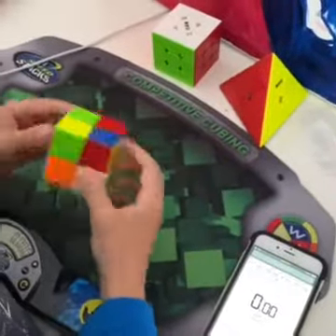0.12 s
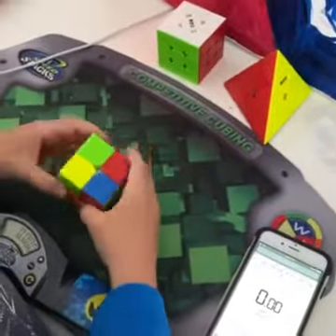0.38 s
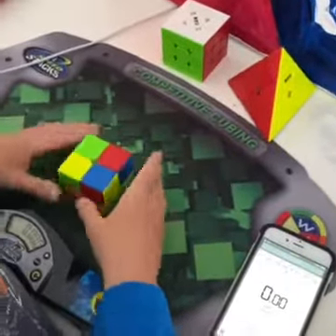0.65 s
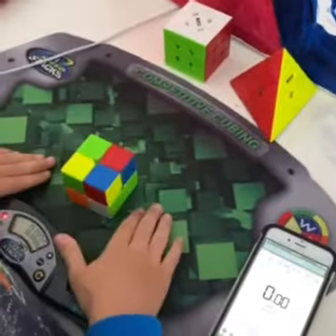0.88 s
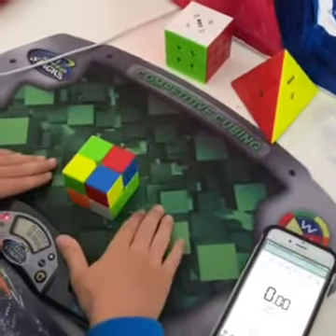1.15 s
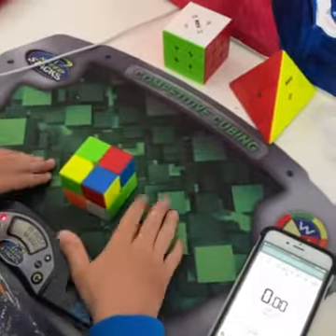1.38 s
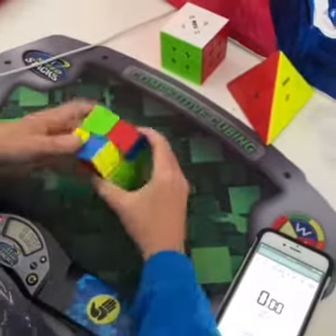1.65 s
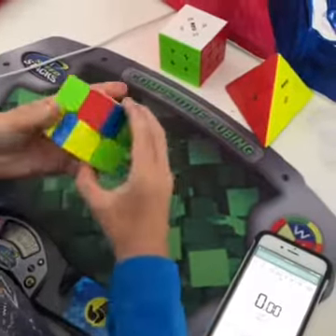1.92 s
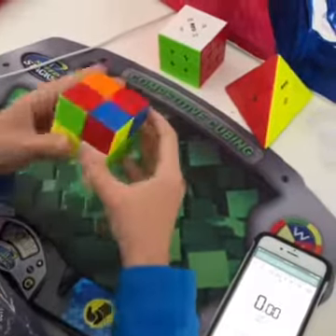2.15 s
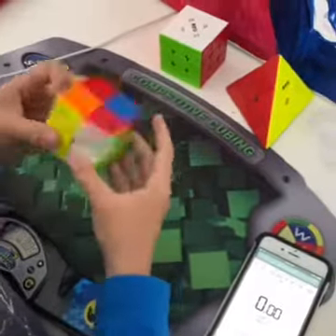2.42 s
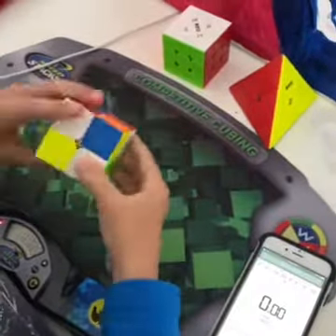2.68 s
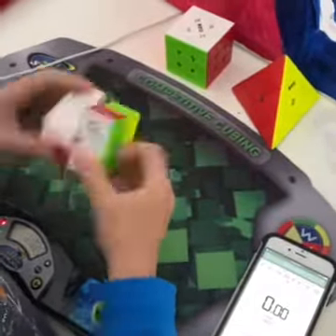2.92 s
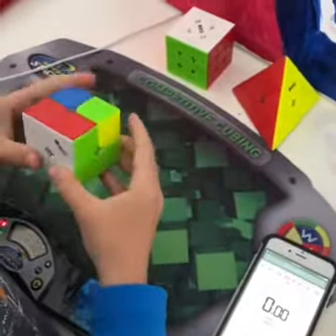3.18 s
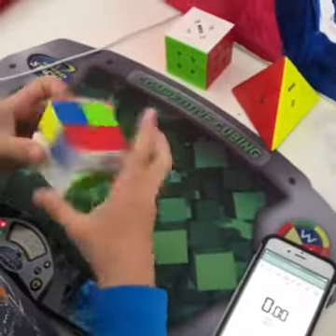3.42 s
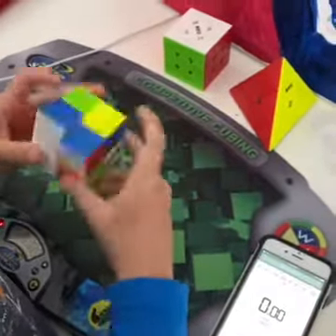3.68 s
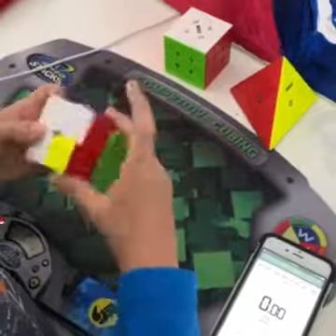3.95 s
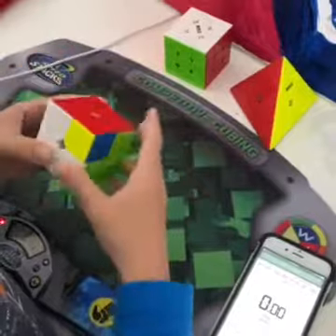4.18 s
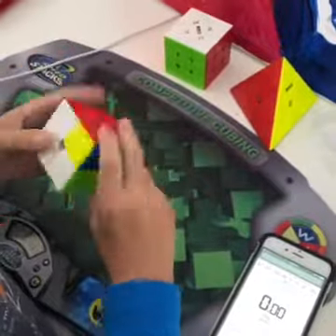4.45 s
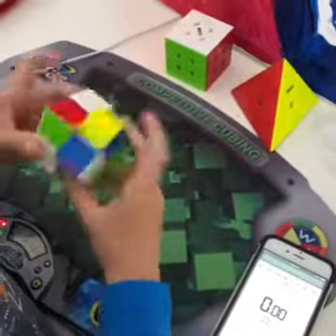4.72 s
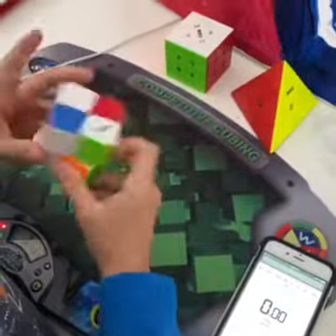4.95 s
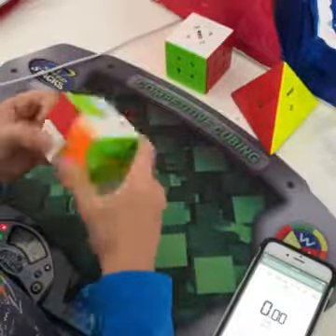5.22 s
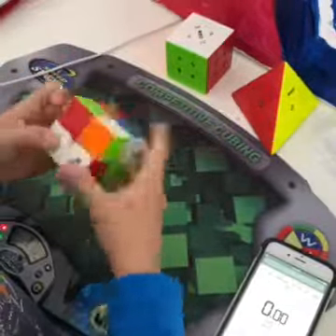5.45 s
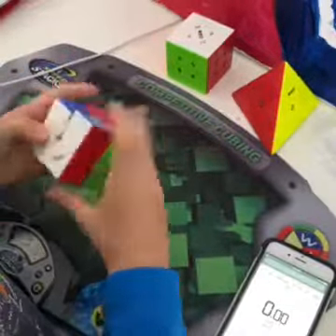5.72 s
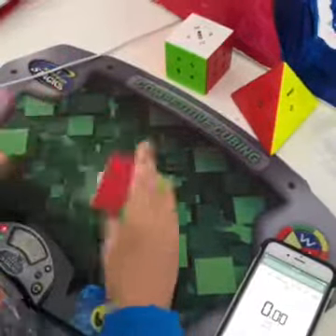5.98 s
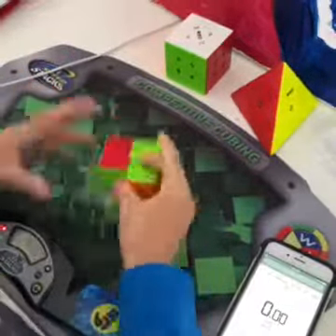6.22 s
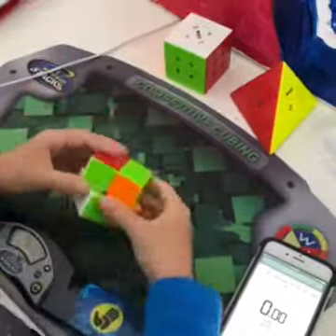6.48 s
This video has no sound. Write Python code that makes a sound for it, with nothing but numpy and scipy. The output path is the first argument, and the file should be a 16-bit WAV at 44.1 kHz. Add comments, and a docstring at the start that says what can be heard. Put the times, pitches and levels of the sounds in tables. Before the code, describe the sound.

A quiet, dark hum and soft air noise run throughout in a small room, heard closely in stereo. Around 0.4 and 0.6 s a hollow plastic puzzle cube bumps onto a matted table with dull low thuds, and at 0.8 s a softer touch and brush of hands follows. Near quiet until a faint rustle at 1.4 s; at 1.5 s the cube is picked up with light clicks. From 1.6 s layers turn in quick snapping bursts with grainy scrapes, busy around 2.0, 2.4 and 2.8 s, sparse near 3.1 s, then sharper at 3.6 to 4.0 s. After a short gap, clicking resumes at 4.4 s and thickens into loud, bright clatter peaking around 5.3 s, thinning by 5.7 s. At 5.9 s the cube drops with a hard slap and deep table boom; at 6.24 s a second, less boomy slap lands, fading into hum by 6.6 s.

```python
"""A deep machine hum and dark air noise come first; then a hollow plastic puzzle cube is set on a mat.
It is picked up and turned fast, then dropped twice. Contacts and sliding grains ring its hollow pieces;
mat landings ring the table as decaying sines, with filtered-noise brushing and dry slaps above.
A small room answers with noise tails. A phone with two microphone ports lies close by, the left one nearer."""
import sys
import numpy as np
from scipy import signal
from scipy.fft import rfft, irfft
from scipy.io import wavfile
from scipy.ndimage import uniform_filter1d, map_coordinates

SR = 44100
rng = np.random.default_rng(int(sys.argv[2]) if len(sys.argv) > 2 else 0)


def to_wav(sig):
    """Store sig (one row per channel, or 1-D mono) as 16-bit WAV at the path in sys.argv[1].

    Samples outside -1..1 are clipped; the rate is SR.
    """
    pcm = np.clip(np.atleast_2d(sig), -1, 1) * 32767
    pcm = np.round(pcm).astype(np.int16)
    wavfile.write(sys.argv[1], SR, pcm.T)  # frames by channels


def volts(x):
    """Linear amplitude factor 10**(x/20) for a level x in dB, scalar or array-like."""
    e = np.asarray(x, float) / 20
    return 10 ** e


N = 291439  # samples

# Levels in the tables are relative, ahead of the room and the final tone colour, unless marked rms or peak.
# wavering bands of the machine hum: centre_hz, width_hz (of the first of two resonances), level_db (rms)
HUM_BANDS = [(52.7, 25, -61.5), (274.9, 7.8, -71), (417.6, 7, -77.5)]
# centre and rms level of the motor note; size of its random pitch waver before smoothing
MOTOR_HZ, MOTOR_DB, WAVER_HZ = 56.5, -55, 1.65
# faint drifting tone: time_s, pitch_hz, level_db (rms)
FAINT_TONE = [(2.901, 150.8, -76.5), (3.802, 162, -69), (4.499, 168, -69), (6.61, 166.6, -67.5)]
# spectrum of the air noise: frequency_hz, level_db
AIR_SPECTRUM = [(37, -18.5), (59, -20.5), (82, -10), (206, -20), (270, -21.5), (363, -25.5), (620, -29.5),
                (734, -40.5), (4500, -56.5), (6500, -56), (8500, -58.5), (16000, -64)]
AIR_DB = -64  # rms, before the side part is turned down
# decay of the room in bands: centre_hz, t60_s, side_share (0-1)
ROOM_BANDS = [(121, 0.41, 0.2), (514, 0.4, 1), (1660, 0.14, 0), (3860, 0.55, 0.8), (10000, 0.31, 0.1)]
ROOM_DB, PLACE_S = -9, 0.03  # gain of the tails; time for the cube to reach another place
# resonances of the table: pitch_hz, level_db, t60_s
TABLE_MODES = [(111.5, 1, 0.29), (150.7, 1, 0.24), (184.5, 2, 0.15), (228, -4.5, 0.091), (261, -3, 0.15),
               (315.4, -8.5, 0.27), (368, -8.5, 0.17), (439, -5, 0.081), (544, -2, 0.19)]
# cube and hands landing on the mat: start_s (of the push, a little ahead of the heard boom), push_db,
# push_length_s, mode_tilt_db (per octave)
LANDINGS = [(0.404, -32.5, 0.0066, 6.5), (0.595, -33, 0.0034, 4), (0.791, -48, 0.0043, -18),
            (0.81, -47.5, 0.0029, 1.5), (1.486, -43, 0.004, 0.5), (5.88, -17, 0.0032, 0.5),
            (6.227, -26, 0.0029, 2.5)]
# hands and cube brushing over the mat: peak_s, level_db, swell_db_per_s, fade_db_per_s
RUSTLES = [(0.42, -74, 297.5, 77), (0.801, -55.5, 600, 173), (1.365, -62, 500, 74)]
# spectrum of the brushing: frequency_hz, level_db
RUSTLE_SPECTRUM = [(400, -4.5), (1000, -3), (2500, -6), (4500, -11), (6300, -17.5), (16000, -12)]
# a flat face of the cube slapping the mat: start_s, level_db (peak), pitch_hz
SLAPS = [(0.41, -46, 1370), (0.601, -32, 830), (5.8887, -9.5, 1173), (6.236, -8.5, 1210)]
# bands of a slap: centre (multiple of the pitch), width (multiple of the pitch), level_db
SLAP_BANDS = [(.55, 0.52, 3), (1., 0.19, 21), (2.1, 0.56, -19)]
SLAP_T60_S = 0.025  # decay of the crackle ahead of its resonances
# scrapes of layers and fingers; the last two rows are the grainy dying-away after the two drops:
# peak_s, level_db, edge_db (relative to it), swell_db_per_s, fade_db_per_s
SCRAPES = [(1.626, -58, -2, 176, 150), (1.983, -45.5, -2.5, 334, 335), (2.097, -52, -6.5, 326, 212.5),
           (2.4, -48, -3, 233, 109.5), (2.703, -52, -1, 410, 60.5), (2.788, -53, -3.5, 97, 100.5),
           (2.899, -54, -37, 107, 72), (3.393, -50.5, -9, 250, 199.5), (3.545, -53, -3, 249.5, 379),
           (3.634, -54.5, -4, 372, 136.5), (3.804, -44.5, -3.5, 243, 206.5),
           (3.961, -43.5, -10.5, 432.5, 598.5), (4.001, -58.5, -95.5, 297, 46.5),
           (4.471, -52, -7, 213, 50.5), (4.613, -50, -8, 264.5, 48.5), (4.909, -47.5, -6, 54.5, 26),
           (5.284, -42, -7.5, 61.5, 70), (5.362, -47, 14, 1500, 326.5), (5.592, -48.5, -11, 152.5, 269.5),
           (5.65, -61, -24, 99.5, 37.5), (5.9, -46, -6, 325, 63), (6.25, -47.5, -11.5, 390, 52)]
# clearest snaps and knocks of the pieces: start_s, cavity_db, wall_db, edge_db
SNAPS = [(0.105, -76, -65, -60), (0.1112, -83, -75, -57), (0.121, -83, -68, -62.5), (0.132, -83, -69, -67),
         (0.413, -53.5, -74, -54), (0.6024, -48, -73, -47), (0.799, -44.5, -48.5, -56),
         (1.358, -81, -61, -82), (1.375, -64, -54.5, -70), (1.42, -75, -79, -57.5),
         (1.529, -43.5, -43.5, -52), (1.5642, -45, -59, -53), (1.609, -45, -52, -60), (1.62, -30, -42, -48),
         (1.73, -54, -44.5, -51), (1.758, -48, -40, -71), (1.781, -37.5, -35.5, -69),
         (1.803, -41, -47, -47), (1.813, -59, -31, -68), (1.917, -52, -49.5, -53.5),
         (1.9693, -29.5, -30.5, -35.5), (1.9797, -31.5, -49, -52), (2.003, -40.5, -30, -52),
         (2.083, -51, -40, -59), (2.2582, -51, -46, -53), (2.328, -51, -47, -50), (2.376, -40, -36.5, -41),
         (2.3958, -29.5, -30, -51), (2.4208, -38, -29, -45), (2.4389, -67, -39, -58.5),
         (2.707, -37, -25, -43), (2.7449, -35, -31.5, -41), (2.779, -41, -28, -35), (2.7836, -37, -29, -32),
         (2.807, -68, -82, -35), (2.8676, -31.5, -36.5, -33.5), (2.902, -33.5, -72, -49),
         (2.922, -62, -37, -55), (2.931, -49, -67, -60), (3.089, -78, -75, -55.5), (3.3399, -53, -66, -63),
         (3.36, -68.5, -45.5, -55.5), (3.3882, -37, -53, -48.5), (3.4172, -65, -42, -49),
         (3.4984, -39, -60, -53), (3.5364, -35, -51, -73), (3.621, -32, -45, -50), (3.633, -61, -53, -39),
         (3.6409, -32, -26, -31.5), (3.76, -21, -27, -22.5), (3.7805, -30, -50.5, -40),
         (3.799, -22, -18, -18.5), (3.8546, -27, -30, -57), (3.8683, -37, -31.5, -44.5),
         (3.8763, -39.5, -32, -54), (3.922, -37, -45, -39), (3.9583, -40, -27.5, -57.5),
         (3.97, -57, -44, -54), (4.4026, -71, -45.5, -54), (4.4239, -45, -42.5, -46),
         (4.4605, -42, -41, -39), (4.4962, -41, -41, -44), (4.5522, -37, -33, -47),
         (4.603, -32, -38, -32.5), (4.6117, -27.5, -33, -19.5), (4.6178, -34, -29, -59),
         (4.6288, -34, -55, -40), (4.6433, -41, -57, -58), (4.695, -36, -53, -27), (4.6985, -24, -36, -33),
         (4.7773, -70, -36, -49.5), (4.8128, -37.5, -33, -43), (4.8702, -32, -28.5, -39),
         (4.9082, -28.5, -24.5, -30), (4.9511, -33, -27, -28.5), (4.9956, -66, -27, -65),
         (5.029, -37, -33.5, -45), (5.0683, -29, -20.5, -24), (5.097, -45.5, -57, -37),
         (5.169, -43, -38, -39), (5.1728, -33, -24.5, -38.5), (5.2057, -43, -53, -55),
         (5.2407, -63, -31, -67), (5.2519, -31.5, -25, -35), (5.276, -16.5, -16, -21),
         (5.2849, -32, -28, -27), (5.34, -57, -27.5, -43.5), (5.359, -52, -36, -19.5),
         (5.3636, -51, -25, -25), (5.3754, -19, -16.5, -24.5), (5.3877, -35, -40.5, -49),
         (5.4753, -34.5, -39, -60), (5.5016, -41, -36, -35), (5.524, -34.5, -30.5, -35.5),
         (5.544, -47, -33.5, -45), (5.5795, -37, -26, -64), (5.5896, -46, -52, -36),
         (5.728, -48.5, -47, -56), (5.7862, -47.5, -48, -79), (5.8888, -19.5, -31, -14.5),
         (5.896, -48, -41, -29), (6.041, -51, -50, -45), (6.132, -46.5, -41.5, -42),
         (6.236, -27.5, -38, -19.5)]
# stretch in which loose pieces can tick: start_s, end_s
IN_HAND_S = (1.5, 5.8)
# ticks against the scrape: level, spread of sizes, spread over the parts, spread down the swell and fade
TICK_DB, TICK_SIZE_DB, TICK_PART_DB, TICK_REACH_DB = -2.5, 6.5, 4, 5
TICKS_PER_SCRAPE = 26
# resonances of the hollow inside the cube: centre_hz, width_hz, level_db
CAVITY = [(460, 470, -1.5), (827, 13, 4.5), (918.5, 54, 21.5), (993, 98, 14.5), (1142.3, 290, 11.5),
          (1415, 630, 0.5)]
# resonances of the plastic walls: centre_hz, width_hz, level_db
WALL = [(1885, 23, 3.5), (1965, 305, 8.5), (2956, 670, -0.5)]
# resonances of the edges: centre_hz, width_hz, level_db
EDGE = [(3420, 510, 26), (4140, 3200, 14.5), (5970, 1040, 27.8), (6640, 1160, 15.9)]
# sheen above the edge resonances: centre_hz, width_hz, level_db
SHEEN = [(10290, 2100, -3.5), (14700, 1900, 0)]
# random spread of mode pitch (fraction) and level at each blow; drift of shares, before smoothing
DETUNE, SPOT_DB, DRIFT_DB = 0.04, 4, 4
# what the small body radiates, little of it bass: frequency_hz, gain_db
RADIATED = [(250, -27), (430, -8.5), (620, -7.5), (800, -0.5), (16000, -4)]
# extra path to the right port as the cube moves: time_s, lag_s (before a small wobble)
PORT_LAG = [(0, 0.00014), (5.7, 0.00019), (5.85, 0.000075), (6.61, 0.00017)]
TABLE_RIGHT_DB, CUBE_RIGHT_DB = 2, 1.32  # how much louder the right port takes them directly
# tone colour of the whole sound, a lift near 6.5 kHz, narrow dips near 9 and 13 kHz and a falling top:
# frequency_hz, gain_db
TONE_COLOUR = [(4800, 1), (6500, 4), (8300, -1), (8700, -14.5), (9300, -8), (9800, -1), (12400, -1.5),
               (12900, -28.5), (13600, -14.5), (14200, -0.5), (16000, -10), (17000, -38)]


def level(x, db):
    """Scale to an rms level."""
    return x * volts(db) / np.sqrt(np.mean(x ** 2))


def ring(x, hz, width_hz):
    """Two-pole resonance, gain 1 at the centre."""
    return signal.lfilter(*signal.iirpeak(hz, hz / width_hz, fs=SR), x)


def colour(x, points):
    """Shape a sound by (frequency_hz, gain_db) points, joined on a log frequency axis."""
    hz, db = np.transpose(points)
    f = np.maximum(np.arange(N // 2 + 1) * SR / N, 1)
    return irfft(rfft(x) * volts(np.interp(np.log(f), np.log(hz), db)), N)


def add(track, s, sound):
    """Mix a sound in at a time."""
    i = int(s * SR)
    track[i:i + len(sound)] += sound[:len(track) - i]


def decay(t, t60):
    """Exponential fall of 60 dB in t60 seconds."""
    return np.exp(-np.log(1000) * t / t60)


def wander(hold, smooth):
    """Slow random curve: held random values, smoothed; both lengths in samples."""
    return uniform_filter1d(np.repeat(rng.standard_normal(N // hold + 1), hold), smooth)[:N]


def rough_grains(spread_db, limit):
    """Friction noise of mostly small catches with rare large ones."""
    return rng.standard_normal(N) * volts(spread_db * np.minimum(rng.exponential(size=N), limit))


def swell_and_fade(s, db, swell, fade):
    """Gain of each stroke, rising to its peak and falling at steady rates in dB per second."""
    t = np.arange(N) / SR
    return volts(db - np.where(t < s, swell * (s - t), fade * (t - s)))


def background():
    """An unsteady motor note, wavering hum bands and a faint drifting tone over a dark air noise."""
    t = np.arange(N) / SR
    hum = 0
    for hz, width, db in HUM_BANDS:
        band = ring(ring(rng.standard_normal(N), hz, width), hz, 2 * width)
        hum = hum + level(band, db)
    motor_hz = MOTOR_HZ + WAVER_HZ * wander(4000, 4000)
    motor = level(np.sin(2 * np.pi * np.cumsum(motor_hz) / SR), MOTOR_DB)
    s, hz, db = np.transpose(FAINT_TONE)
    tone_phase = 2 * np.pi * np.cumsum(np.interp(t, s, hz)) / SR
    tone = np.sqrt(2) * volts(np.interp(t, s, db)) * np.sin(tone_phase)
    mid, side = level(colour(rng.standard_normal((2, N)), AIR_SPECTRUM), AIR_DB)
    return hum + motor + tone + mid + 0.55 * side * np.array([[1], [-1]])


def room(x):
    """Diffuse two-port noise tails, each band with its own decay and width; four places take turns."""
    t = np.arange(int(0.8 * SR)) / SR
    places = 4
    turn = np.arange(N) / SR / PLACE_S
    out = 0
    for k in range(places):
        tail = 0
        for hz, t60, apart in ROOM_BANDS:
            mid, side = ring(rng.standard_normal((2, len(t))), hz, 1.5 * hz)
            ports = mid + apart * side * np.array([[1], [-1]])
            tail = tail + ports * np.sqrt(1000 / hz) * decay(t, t60)
        tail = tail * np.clip(t / 0.0016, 0, 1)  # soft onset
        tail = tail / np.sqrt(np.sum(tail[0] ** 2))
        # fade from place to place, round and round
        away = np.abs((turn - k + places / 2) % places - places / 2)
        here = x * np.cos(np.pi / 2 * np.minimum(away, 1))
        out = out + signal.fftconvolve(here[None], tail, axes=1)[:, :N]
    return out


def table():
    """A soft push through the mat rings the low table modes, which take a few ms to build up."""
    out, t = np.zeros(N), np.arange(SR // 2) / SR
    for s, db, length, tilt_db in LANDINGS:
        bump = np.hanning(max(int(length * SR), 8))
        modes = 0
        for k, (hz, mode_db, t60) in enumerate(TABLE_MODES):
            swing = (-1) ** k * volts(mode_db + tilt_db * np.log2(hz / 150))  # neighbours swing oppositely
            modes = modes + swing * np.sin(2 * np.pi * hz * t) * decay(t, t60)
        add(out, s, volts(db) * np.convolve(modes, bump / bump.sum()))
    # below its first mode the board hardly moves air
    return signal.sosfilt(signal.butter(4, 90, "high", fs=SR, output="sos"), out) * volts(-4.5)


def rustles():
    """Broad, grainy brushing of hands and cube over the mat, swelling and fading."""
    gain = swell_and_fade(*np.array(RUSTLES).T[:, :, None]).sum(axis=0)
    brushing = level(colour(rough_grains(3.6, 5), RUSTLE_SPECTRUM), 0)
    return brushing * volts(2.6 * wander(300, 150)) * gain


def slaps():
    """A dry, broad crack of squeezed air and mat under the cube: one firm contact and a short crackle."""
    t = np.arange(2000) / SR
    out = np.zeros(N)
    for s, db, hz in SLAPS:
        push = 0.14 * rng.standard_normal(len(t)) * decay(t, SLAP_T60_S)
        push[0] = 1
        crack = sum(volts(band_db) * ring(push, hz * k, hz * w) for k, w, band_db in SLAP_BANDS)
        add(out, s, volts(db) * crack / np.abs(crack).max())
    return out


def scrapes():
    """Overlapping grainy strokes add in power, giving gains of the hollow body and of the edges."""
    s, db, edge_db, swell, fade = np.array(SCRAPES).T[:, :, None]
    power = swell_and_fade(s, db, swell, fade) ** 2
    return np.sqrt(power.sum(axis=0)), np.sqrt((power * volts(edge_db) ** 2).sum(axis=0))


def ticks(rub, edge_rub):
    """Loose pieces tick at random while a layer scrapes; gives times and gains of the three parts."""
    s, _, _, swell, fade = np.array(SCRAPES).T[:, :, None]
    reach_db = TICK_REACH_DB * rng.standard_normal((len(s), TICKS_PER_SCRAPE))
    tick_s = (s + reach_db / np.where(reach_db < 0, swell, fade)).ravel()
    tick_s = tick_s[(tick_s > IN_HAND_S[0]) & (tick_s < IN_HAND_S[1])]
    at = (tick_s * SR).astype(int)
    size_db = TICK_SIZE_DB * rng.standard_normal((len(at), 1))
    part_db = TICK_PART_DB * rng.standard_normal((len(at), 3))
    scrape_gain = np.array([rub[at], rub[at], edge_rub[at]]).T
    return tick_s, volts(TICK_DB + size_db + part_db) * scrape_gain


def chatter(count, rise_s, decay_s, lead, size=1200):
    """Each snap is a cluster of tiny contacts that builds up to the main one and dies in a few ms."""
    t = (np.arange(size) - lead) / SR
    t = t * volts(2 * rng.standard_normal((count, 1)))  # some snaps are crisp, some drawn out
    shape = np.exp(np.where(t < 0, t / rise_s, -t / decay_s))
    sizes = volts(1.7 * rng.exponential(size=(count, size)) - 16.5)
    contacts = rng.standard_normal((count, size)) * sizes
    contacts[:, lead] = volts(-8)  # the main contact
    return contacts * shape


def struck(modes, push):
    """Each blow rings the modes a little detuned and unevenly, as the pieces sit differently every time."""
    hz, width, db = np.transpose(modes)[:, None, :, None]
    chance = rng.standard_normal((len(push), 2, len(modes), 1))
    hz = hz * (1 + DETUNE * chance[:, 0])
    size = 4096
    f = np.arange(size // 2 + 1) * SR / size
    damping = 1j * f * width
    resonance = damping / (hz ** 2 - f ** 2 + damping)
    answer = np.sum(volts(db + SPOT_DB * chance[:, 1]) * resonance, axis=1)
    return irfft(rfft(push, size) * answer, size)


def body(modes, push):
    """Sum of the resonances under sliding; their shares drift as the pieces slide."""
    return sum(volts(db + DRIFT_DB * wander(1500, 1500)) * ring(push, hz, w) for hz, w, db in modes)


def cube():
    """Snaps, loose ticks and stick-slip grains excite cavity, wall and edge resonances and their sheen."""
    rub, edge_rub = scrapes()
    grains = rough_grains(4.2, 6) * volts(2.4 * wander(200, 100))  # in patches of a few ms
    tick_s, tick_gains = ticks(rub, edge_rub)
    snaps = np.array(SNAPS)
    times = np.concatenate([snaps[:, 0], tick_s])
    cavity_gain, wall_gain, edge_gain = np.vstack([volts(snaps[:, 1:]), tick_gains]).T
    # the sheen follows the edges; the mat muffles it once the cube has left the hand
    sheen_gain = volts(np.where(times < IN_HAND_S[1], -4.5, -9.5)) * edge_gain
    lead = 200  # samples ahead of the main contact
    blows = chatter(len(times), 0.0013, 0.0018, lead)
    # cavity and walls feel the main contact more, the edges every small one
    firm = blows + 0.33 * np.eye(1, blows.shape[1], lead)
    parts = [(CAVITY, firm, cavity_gain, volts(-1.0) * rub),
             (WALL, firm, wall_gain, volts(-2.0) * rub),
             (EDGE, blows, edge_gain, edge_rub),
             (SHEEN, blows, sheen_gain, volts(4.0) * edge_rub)]
    out = np.zeros(N)
    for modes, push, gain, slide in parts:
        rings = struck(modes, push)
        rings = rings * np.sqrt(0.0039 * SR / np.sum(rings ** 2, axis=1, keepdims=True))  # equal energy
        for s, size, sound in zip(times, gain, rings):
            add(out, s - lead / SR - 0.0005, size * sound)
        out = out + level(body(modes, grains), 0) * slide
    return colour(out, RADIATED)


def scene():
    """The cube is nearer the left port, so the right hears it a little later; turning it shifts the lag."""
    near, low = cube() + slaps() + rustles(), table()
    t = np.arange(N) / SR
    lag = np.interp(t, *np.transpose(PORT_LAG)) + 0.00003 * wander(2000, 2000)
    # long waves bend round the phone and arrive closer together
    bass = signal.sosfiltfilt(signal.butter(2, 2600, fs=SR, output="sos"), near)
    late_bass = map_coordinates(bass, [(t - 0.45 * lag) * SR], order=3)
    late_treble = map_coordinates(near - bass, [(t - lag) * SR], order=3)
    cube_ports = np.array([near, volts(CUBE_RIGHT_DB) * (late_bass + late_treble)])
    table_ports = np.array([low, volts(TABLE_RIGHT_DB) * low])
    return cube_ports + table_ports + volts(ROOM_DB) * room(near + 0.36 * low) + background()


def top_cut(x):
    """Nothing passes above the cut-off."""
    return signal.sosfilt(signal.butter(12, 17020, fs=SR, output="sos"), x)


def record(dry):
    """The sound gets a lift near 6.5 kHz and two narrow treble dips, and the deepest bass is dropped."""
    coloured = colour(dry, TONE_COLOUR)
    heard = signal.sosfilt(signal.butter(4, 45, "high", fs=SR, output="sos"), coloured)
    return top_cut(heard)


dry = scene()
out = record(dry)
to_wav(out)
```